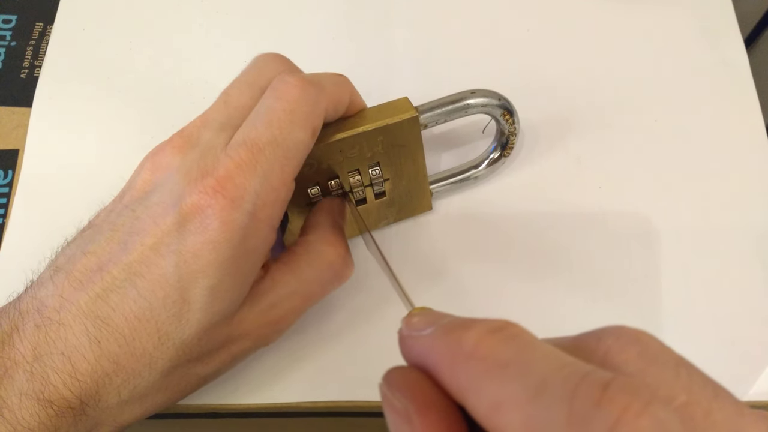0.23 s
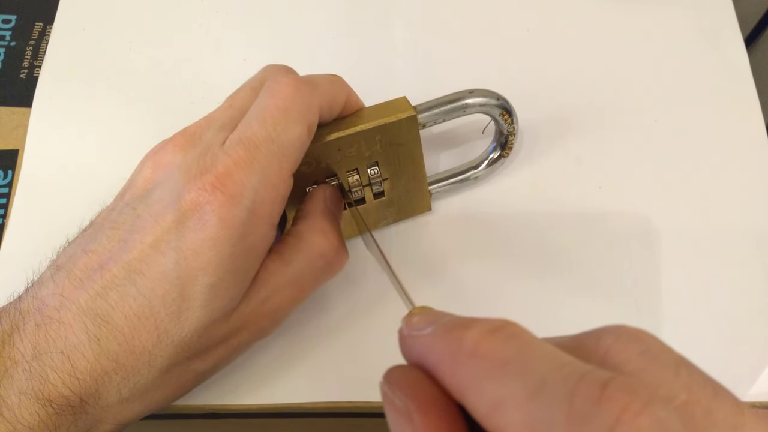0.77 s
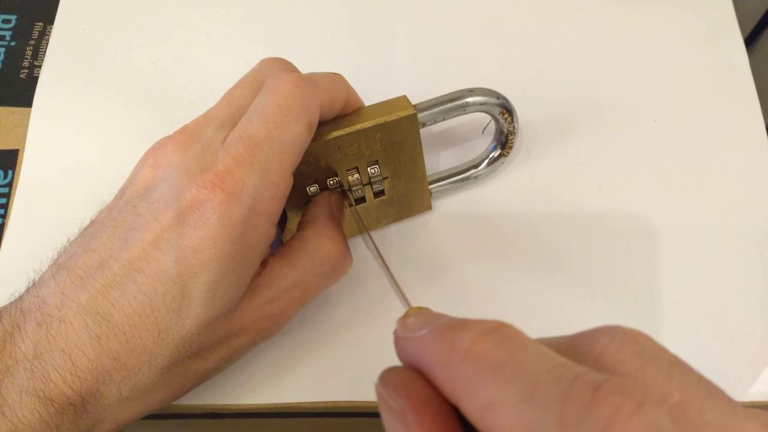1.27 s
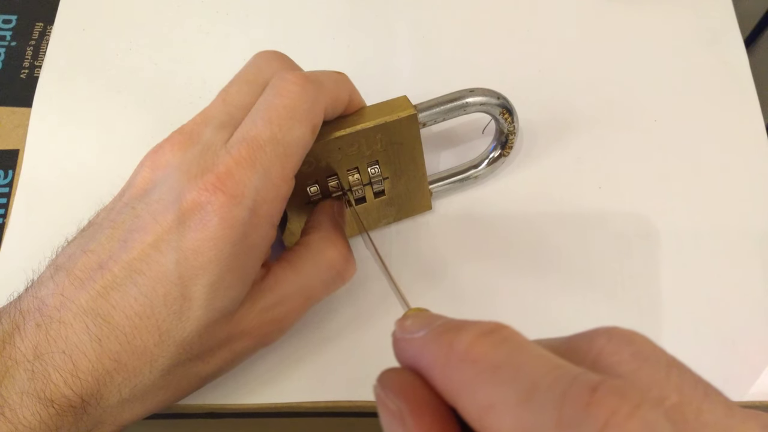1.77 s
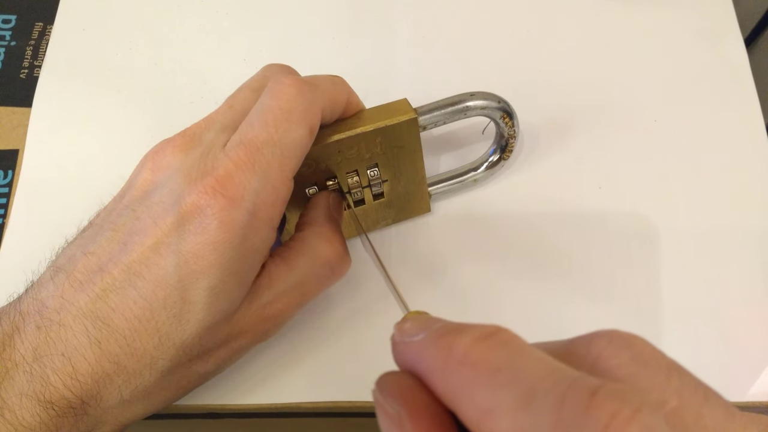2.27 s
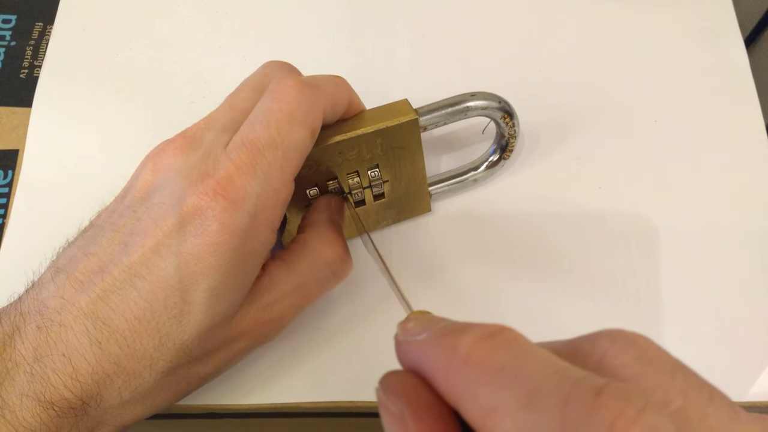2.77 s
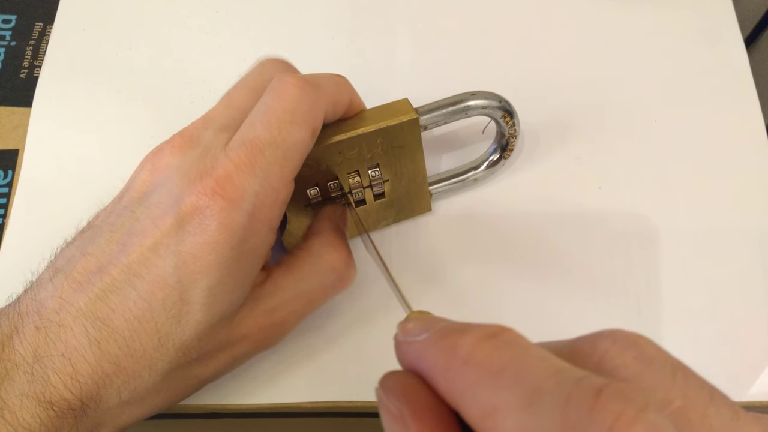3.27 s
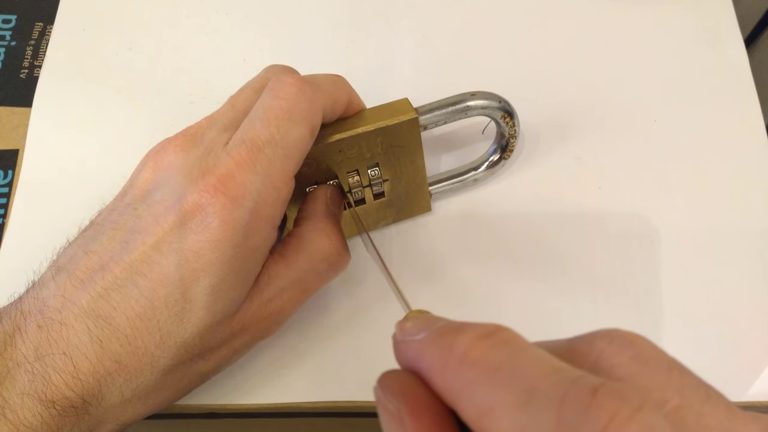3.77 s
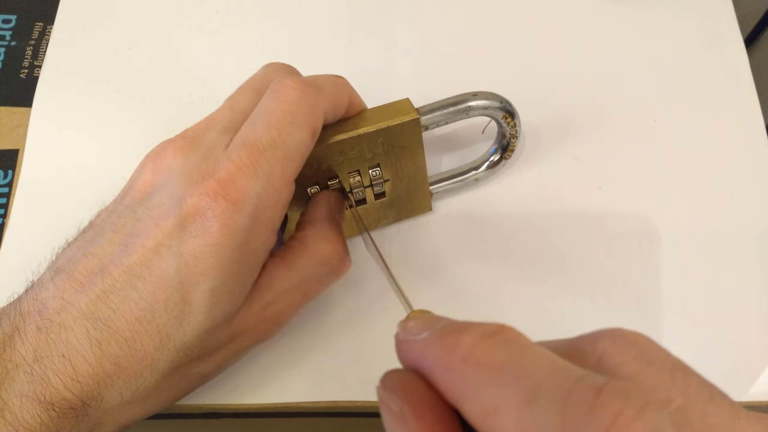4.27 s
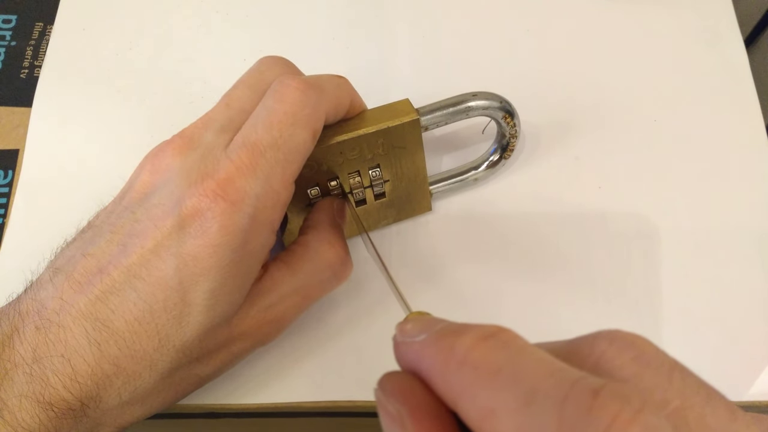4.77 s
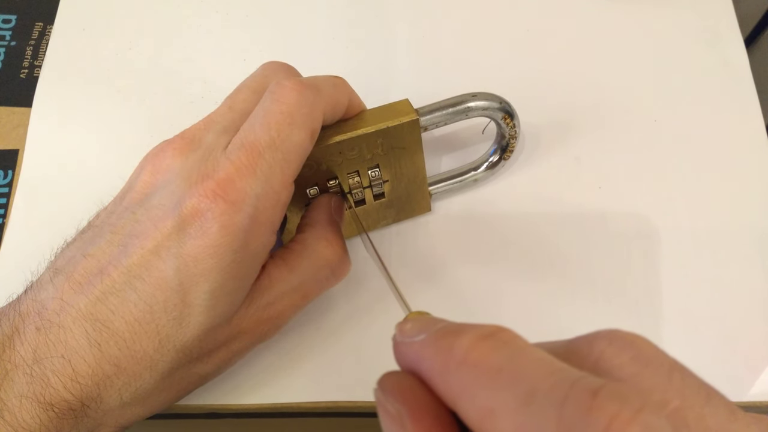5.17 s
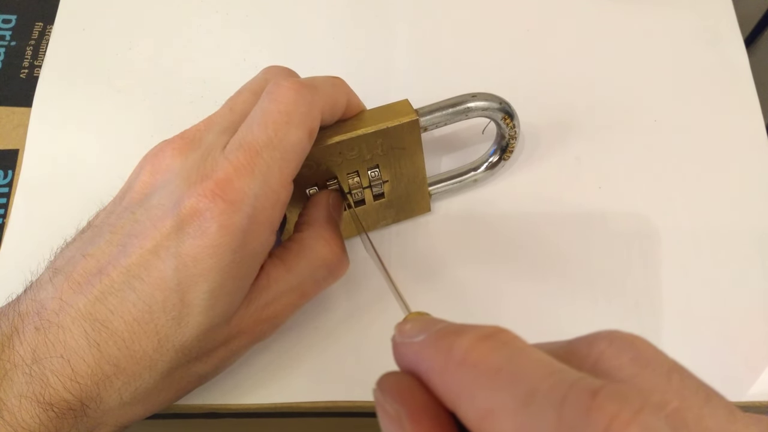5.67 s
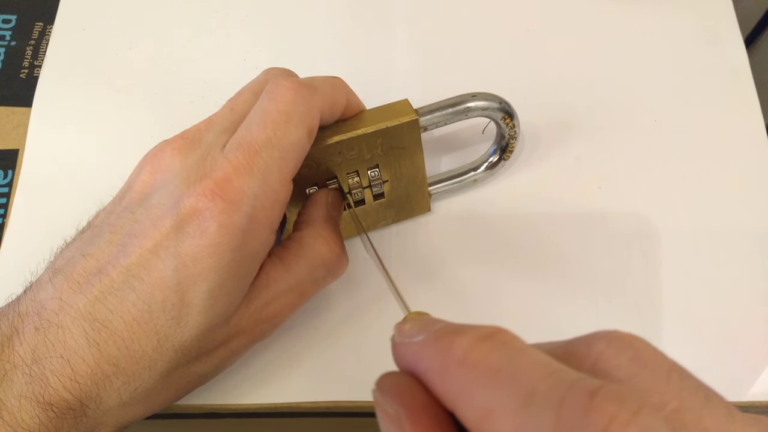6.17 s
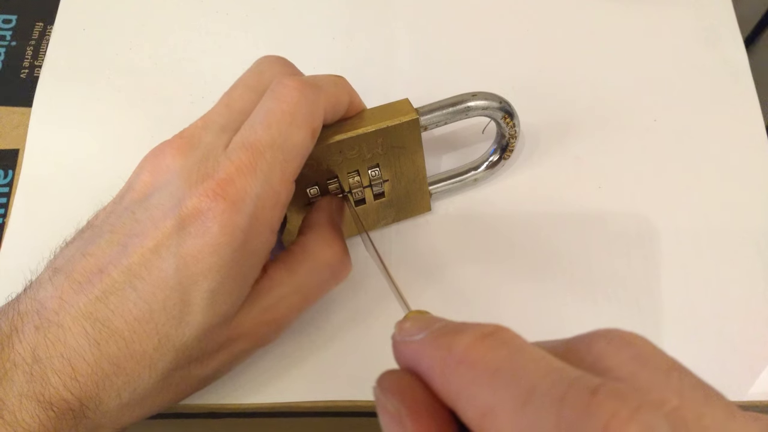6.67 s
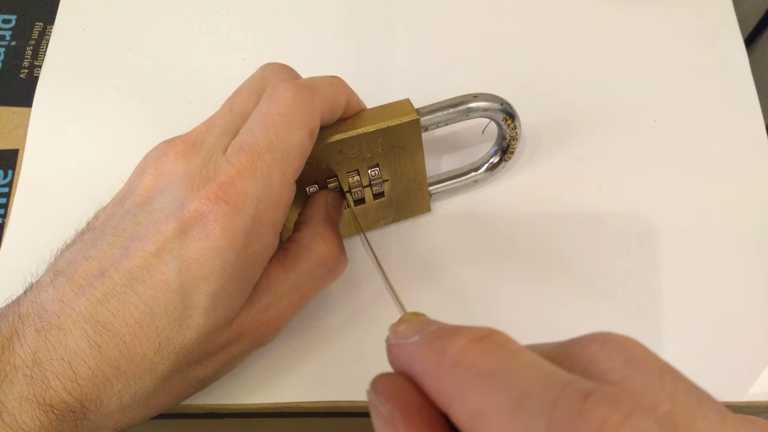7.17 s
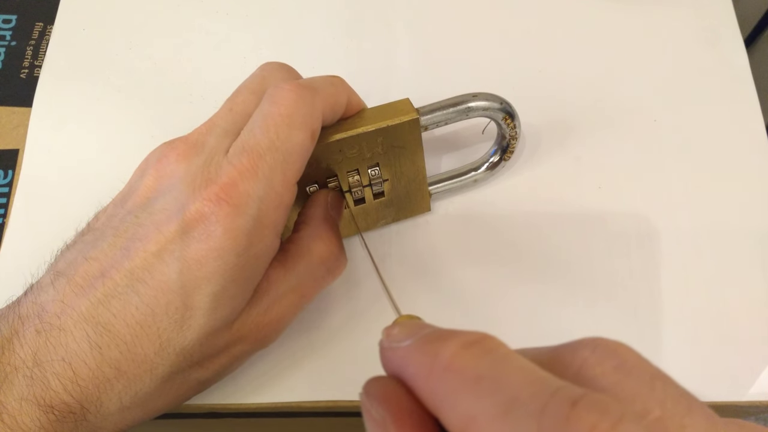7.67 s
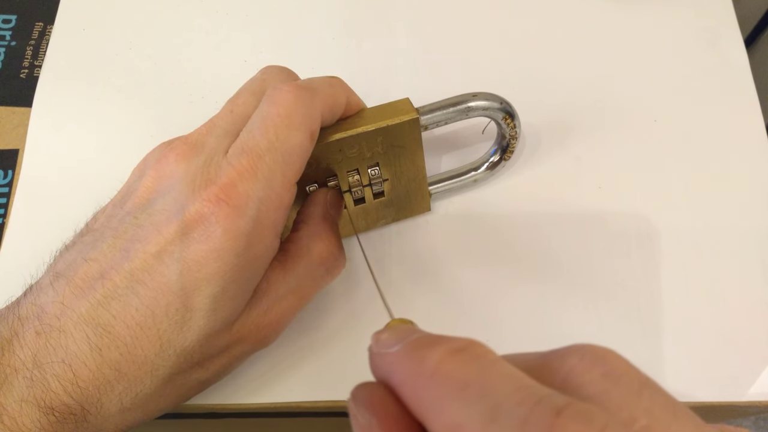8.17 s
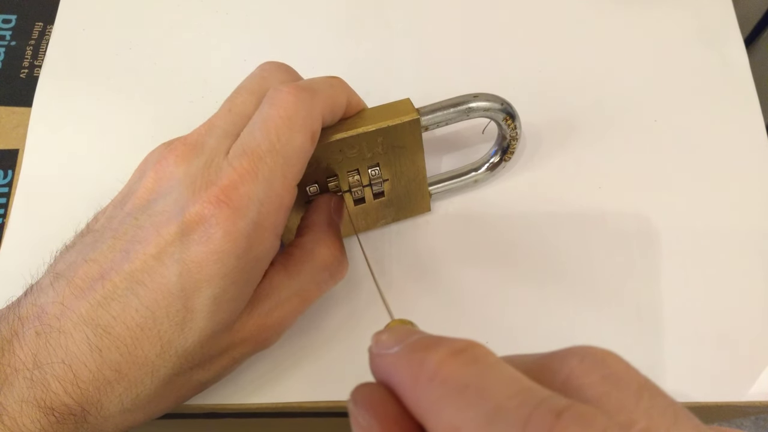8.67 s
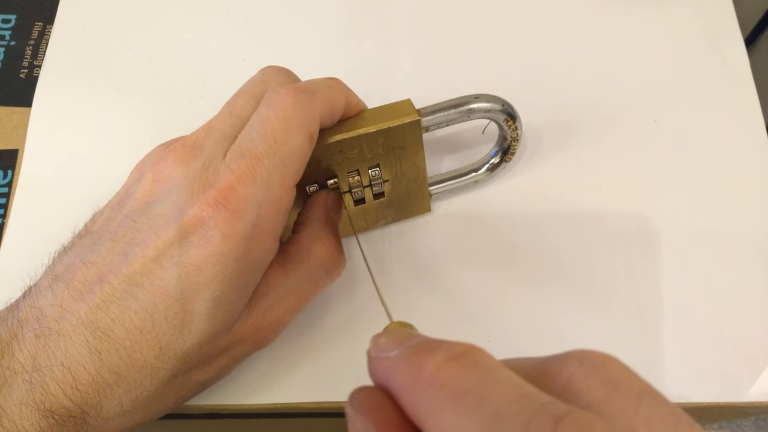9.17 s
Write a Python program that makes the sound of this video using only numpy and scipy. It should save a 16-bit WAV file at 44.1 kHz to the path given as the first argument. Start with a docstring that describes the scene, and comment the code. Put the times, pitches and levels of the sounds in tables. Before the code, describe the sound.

Close to the microphone, a small brass padlock's number wheel snaps with dry, very bright clicks, some followed by a dull tap on the table. Soft, grainy rubbing of thumb and blade comes between. The clicks are busiest in the first five seconds, then sparse. A steady low mains hum and faint hiss fill the quiet room, the hiss throbbing slightly with the hum.

```python
"""A bright snap of brass comes first, close by, over the hum of appliances in a quiet room.
A padlock's number wheel is thumbed from notch to notch beside a thin steel blade: filtered bursts make the
cracks, dying sines ring wheel, body and table, and grainy noise makes the soft rubbing between.
Steady tones, a wandering rumble and coloured noise fill the room.
The recorder's expander makes the hiss throb with the beating of the hum."""
import sys
import numpy as np
from scipy import signal
from scipy.fft import rfft, irfft, next_fast_len
from scipy.io import wavfile

SR = 44100
rng = np.random.default_rng(int(sys.argv[2]) if len(sys.argv) > 2 else 0)


def digitize_waveform(pressure):
    """Quantize a signal to 16-bit integers and store it at the path in sys.argv[1].

    Rows of a 2-D input are taken as channels; values are limited to [-1, 1].
    """
    field = np.atleast_2d(pressure).T
    bounded = np.clip(field, -1, 1)
    quanta = np.round(bounded * 32767).astype(np.int16)
    wavfile.write(sys.argv[1], SR, quanta)


N = 414981  # length [samples]

# All levels below are those ahead of the expander.
# Room air and microphone hiss: (frequency [Hz], density [dB per Hz])
AIR_SPECTRUM = [(20, -103), (45, -83), (130, -70), (180, -91.5), (330, -84), (500, -86), (1000, -90.5),
                (1150, -95), (1500, -93.5), (1750, -99.5), (2400, -97.5), (4000, -99), (6500, -99),
                (8000, -100.5), (9500, -97), (11000, -99.5), (12000, -100), (15600, -101), (15900, -135)]
# Noise gathering in resonances: (centre [Hz], width [Hz], level [dB rms])
BOOM_BANDS = [(68.9, 11.5, -51), (97, 81, -66), (205, 40, -66), (281.2, 16, -65.5), (1610, 11.4, -71),
              (1830, 270, -71.5), (4770, 45, -84)]
# Steady tones of mains and fans: (frequency [Hz], level [dB rms])
HUM_TONES = [(90.0, -49.5), (100.3, -54.5), (120.0, -40.5), (358.45, -68.5), (380.02, -69.5),
             (409.67, -57.5), (434.32, -68.5), (460.87, -70.5), (467.7, -73), (614.51, -75.5), (635.2, -79),
             (672.3, -75.5), (761.55, -76.5), (961.23, -77.5), (1024.18, -76.5), (1357.23, -77.5),
             (1433.94, -81.5), (1476.28, -78.5), (1491.62, -77.5), (1580.76, -77.5), (1591.87, -76.5),
             (1638.62, -74.5), (1785.9, -83), (1880.85, -83.5), (2805.4, -85)]
# A small motor's overtones: (multiple of MOTOR_HZ, level [dB rms])
MOTOR_OVERTONES = [(11, -79.5), (12, -76.5), (14, -74.5), (16, -75.5), (17, -77.5), (19, -81.5),
                   (24, -82.5), (27, -78.5), (29, -82.5), (31, -78.5), (32, -75.5), (34, -80.5),
                   (35, -83.5), (36, -83), (37, -77.5), (48, -82), (49, -80.5), (50, -80.5), (52, -80.5),
                   (60, -86), (62, -87), (81, -82.5), (82, -82.5), (83, -82.5), (85, -84)]
MOTOR_HZ = 57.793
# Level curve of the low rumble: (time [s], level [dB])
RUMBLE_LEVEL = [(0, -62), (1.5, -58.5), (3.7, -61), (4.48, -61), (4.7, -66), (5.7, -67), (8.2, -59),
                (8.4, -53), (9.41, -59.5)]
RUMBLE_WANDER_DB, RUMBLE_STEP_S = 2, .08  # random spread around the curve; time between its turns

# Blade and thumb rub against the wheel, levels before the swell and fade:
# (time [s], length [s], hiss [dB], lock body [dB], table [dB])
RUB_STROKES = [(0.218, 0.026, -59, -77, -64), (0.601, 0.05, -56, -71, -64), (1.004, 0.061, -55, -64, -60),
               (1.815, 0.077, -70, -62, -54.5), (1.995, 0.052, -59, -68, -57), (2.189, 0.11, -62, -75, -61),
               (3.219, 0.019, -58, -63, -54.5), (3.325, 0.027, -61, -70, -56), (3.648, 0.1, -59, -65, -59),
               (3.952, 0.019, -60, -50.5, -54), (4.183, 0.035, -55.5, -64, -57.5),
               (4.381, 0.039, -49, -52.5, -55.5), (8.317, 0.022, -56, -66, -45.5),
               (8.337, 0.035, -64, -59, -50), (8.419, 0.026, -62, -61, -50), (8.574, 0.047, -61, -76, -58),
               (8.85, .04, -62, -66, -69)]
# Colour of the rubbing hiss: (frequency [Hz], relative level [dB])
RUB_HISS = [(6500, -20), (8000, -5), (9000, 5), (10500, 3), (12000, -7), (16000, -19)]

# Snaps of the wheel; slip, chatter and room tail are relative to the crack's peak, before their envelopes:
# (time [s], crack peak [dB], crack centre [Hz], contact decay [ms], slip before it [dB], chatter [dB],
#  room tail [dB], lift of the top band [dB], lock body [dB], centre of body ring [Hz],
#  focus of body ring [dB per octave squared], table knock [dB], centre of knock [Hz])
WHEEL_SNAPS = [(0.0004, -12.5, 11700, 0.21, -40, -24, -35.5, 10, -37, 4300, 10, -52, 744),
               (1.233, -16, 10800, 0.22, -11, -20, -34, 15, -40.5, 4270, 3, -52, 740),
               (1.8074, -16.5, 12500, 0.52, -30, -22, -37, 7, -36.5, 2300, 4.3, -29.5, 780),
               (1.863, -38, 8810, 0.8, -30, -18, -34, 0, -47, 4600, 5, -50, 740),
               (2.0277, -17.5, 11100, 0.21, -30, -24, -33.5, 12, -44, 3010, 8, -50, 740),
               (2.065, -37, 9920, 0.67, -12, -22, -35, 0, -36.5, 4700, 8, -33.5, 880),
               (3.0485, -11, 11300, 0.09, -30, -15, -37, 16, -40, 6600, 6, -55, 740),
               (3.365, -33.5, 11500, 0.32, -30, -15, -31, 0, -38, 2800, 7.5, -33, 740),
               (3.8277, -10.5, 12100, 0.15, -17, -12, -37.5, 0, -34.5, 2930, 10, -52, 740),
               (3.9493, -22.5, 9200, 0.3, -7, -24, -28.5, 3, -30.5, 4040, 2, -42, 950),
               (4.4228, -10, 11900, 0.16, -18, -16, -39, 6, -33, 3300, 3, -42, 850),
               (4.6379, -26.5, 9800, 0.61, -30, -28, -40, 0, -35, 2400, 2, -34, 900),
               (6.501, -60, 9600, 0.4, -30, -20, -33, 0, -58, 3000, 12, -35, 1000),
               (6.5547, -22.5, 12000, 0.33, -19, -18, -39, -6, -34.5, 3150, 41, -28, 696),
               (7.4676, -40, 9470, 0.33, -30, -10, -24, 0, -43, 4400, 12, -58, 740),
               (8.355, -34, 9600, 0.43, -30, -18, -33, 0, -49, 3900, 12, -52, 740),
               (8.362, -50, 9080, 0.47, -30, -14, -33, 0, -44, 4700, 12, -50, 740),
               (8.3722, -59, 10170, 0.43, -30, -6, -33, 0, -61, 2940, 12, -29.5, 740),
               (8.4019, -24.5, 9400, 1, -3, -14, -35, 2, -25, 4740, 85, -18, 750),
               (8.9156, -13, 12500, 0.24, -11, -23, -35, 4, -39, 3400, 3.6, -56, 740)]
# Shared colour of the cracks: (frequency [Hz], relative level [dB])
SNAP_SPECTRUM = [(2000, -40), (4500, -23), (6300, -10), (7400, 2.5), (8200, 1.5), (10700, 3.5),
                 (13000, 1.5), (15600, -5), (17000, -30)]
# Ringing modes of wheel, brass body and table: (frequency [Hz], relative level [dB], 60 dB decay [s])
WHEEL_MODES = [(8600, -17, .04), (8600, -12, .04), (10400, -19, 0.036), (11100, 8, .045), (10600, -16, .1),
               (12200, 8, 0.026), (13300, -1, 0.025), (13750, -16, .03), (14100, -5, .025),
               (15250, -4, .015)]
BODY_MODES = [(1876, 4, 0.011), (2770, -4.5, 0.035), (3260, 11.5, 0.0077), (3850, 8.5, 0.0059),
              (4340, 5.5, 0.011), (4900, 9.5, 0.011), (5250, 6.5, 0.011), (6260, 6.5, 0.019)]
TABLE_MODES = [(227, -13, 0.028), (442, 0, 0.035), (600, 1, 0.03), (718, 7, 0.07), (850, 3, 0.025),
               (980, 4, 0.022), (1200, 1, 0.022), (1650, -5, .018)]

NARROW_DB = 27  # fall either side of a snap's centre [dB per octave squared]
TOP_HZ, TOP_OCTAVES = 15500, 0.12  # narrow bright band above the main snap
ROOM_DULL_DB = 9  # treble lost by the room tail from 10 to 20 kHz [dB]
SLIP_MS, LANDING_S = 0.7, 0.0047  # rise of the slip before a snap; delay of the spring's second landing
EARLY = 100  # room for the slip ahead of a snap [samples]

PIVOT_DB, MAX_LIFT_DB = -36, 2.5  # expander: level passed unchanged, greatest lift
EDGE_HZ = 16600  # upper band limit


def gain_of(db):
    """Turns decibels into amplitude."""
    return 10 ** (np.asarray(db) / 20)


def coloured(x, points, size):
    """Filters by a spectrum of (frequency [Hz], level [dB]) points, joined on a log frequency scale."""
    f, db = np.transpose(points)
    hz = np.fft.rfftfreq(size, 1 / SR)
    response = gain_of(np.interp(np.log(hz + 1), np.log(f), db))
    return irfft(rfft(x, size) * response, size)


def band(x, low_hz, high_hz):
    """Band-passed copy of rms 1."""
    y = signal.sosfilt(signal.butter(2, [low_hz, high_hz], "bandpass", fs=SR, output="sos"), x)
    return y / y.std()


def ring(modes, t, phases, hz, narrow_db):
    """Struck solid: dying sines, favoured near hz, scaled to peak 1."""
    f, db, t60 = np.transpose(modes)[:, :, None]
    db = db - narrow_db * np.log2(f / hz) ** 2
    decay = gain_of(db - 60 * t / t60)
    x = (decay * np.sin(2 * np.pi * (f * t + phases[:len(f), None]))).sum(0)
    return x / abs(x).max()


def air():
    """Broad noise plus a few boomy bands where the room and the machines resonate."""
    size = next_fast_len(N)
    out = coloured(rng.standard_normal(size), AIR_SPECTRUM, size=size) * np.sqrt(SR / 2)
    f = np.fft.rfftfreq(size, 1 / SR)
    for hz, width, db in BOOM_BANDS:
        resonance = 1 / (1 + (2 * (f - hz) / width) ** 2)
        boom = irfft(rfft(rng.standard_normal(size)) * resonance, size)
        out += gain_of(db) * boom / boom.std()
    return out[:N]


def hum():
    """Steady machine tones whose phases drift at random, the higher ones more."""
    motor = [(round(k) * MOTOR_HZ, db) for k, db in MOTOR_OVERTONES]
    tones = np.array(list(HUM_TONES) + motor)
    t, knots = np.arange(N) / SR, np.arange(0, N / SR + 1, .25)
    steps = rng.standard_normal((len(tones), len(knots)))
    drift = np.cumsum(steps, 1) * 0.00018 * tones[:, :1]
    start = rng.random(len(tones)) * 2 * np.pi
    out = np.zeros(N)
    for (hz, db), phase, wander in zip(tones, start, drift):
        angle = 2 * np.pi * hz * t + phase + np.interp(t, knots, wander)
        out += np.sqrt(2) * gain_of(db) * np.sin(angle)
    return out


def rumble():
    """Low band of noise that wanders around its level curve."""
    s, db = np.transpose(RUMBLE_LEVEL)
    t = np.arange(N) / SR
    wander = np.interp(t / RUMBLE_STEP_S, np.arange(400), rng.standard_normal(400))
    level = gain_of(np.interp(t, s, db) + RUMBLE_WANDER_DB * wander)
    return level * band(rng.standard_normal(N), 179, 246)


def rub(length, hiss_db, body_db, table_db):
    """Uneven grains of friction swell quickly and fade, heard in three bands."""
    noise = rng.standard_normal((4, 8192))
    u = np.arange(8192) / SR / length  # progress of the stroke, 0 to 1
    grains = gain_of(2.2 * band(noise[3], 60, 520))
    swell = np.clip(np.minimum(u / 0.35, (1 - u) / 0.38), 0, 1)
    stroke = grains / np.sqrt(np.mean(grains ** 2)) * swell
    hiss = coloured(noise[0], RUB_HISS, size=8192)
    hiss = gain_of(hiss_db) * hiss / hiss.std()
    body = gain_of(body_db) * band(noise[1], 3400, 6100)
    table = gain_of(table_db) * band(noise[2], 360, 1370)
    return stroke * (hiss + body + table)


def click(db, hz, contact_ms, slip_db, chatter_db, room_db, top_db, body_db, body_hz, focus_db,
          knock_db, knock_hz):
    """A slip, then a metal crack and its bounce off the table, wheel ring, scattered tail, body and knock."""
    t = np.arange(8192) / SR
    phases, noise = rng.random(16), rng.standard_normal((4, len(t)))

    # each contact favours its own band
    grid = np.geomspace(2000, 20000, 80)
    f, snap_db = np.transpose(SNAP_SPECTRUM)
    lean = np.interp(np.log(grid), np.log(f), snap_db) - NARROW_DB * np.log2(grid / hz) ** 2
    lean = lean + top_db * np.exp(-(np.log2(grid / TOP_HZ) / TOP_OCTAVES) ** 2)
    lean = np.transpose([grid, lean])

    # an impulse with a short noisy contact, then the fainter bounce 1.5 ms later
    hit = .25 * noise[0] * np.exp(-t * 1000 / max(contact_ms, .05))
    hit[0] = 1
    hit = np.roll(hit, EARLY + 50) + .16 * np.roll(hit, EARLY + 116)
    crack = coloured(hit, lean, size=len(t)) * (t < .02) * np.minimum(t / .003, 1)
    crack = crack / abs(crack).max()

    # time before and after the snap
    since = t - EARLY / SR - .001
    ahead, t = np.minimum(since, 0), np.maximum(since, 0)

    scatter = coloured(noise[1], lean, size=len(t))
    even_scatter = scatter / scatter.std()
    slip = even_scatter * .5 * gain_of(slip_db - 60 * t / 0.0028) * np.exp(ahead * 1000 / SLIP_MS)

    # loose parts chatter, the spring lands a second time, then the nearby walls answer
    landing = np.exp(-((t - LANDING_S) / 0.0007) ** 2)
    chatter = even_scatter * gain_of(chatter_db) * (0.6 * gain_of(-60 * t / 0.012) + 0.25 * landing)
    dull = coloured(scatter, [(10000, 0), (20000, -ROOM_DULL_DB)], size=len(t))
    walls = dull / dull.std() * gain_of(room_db - 60 * (t - .02) / 0.15)  # room level is met at 20 ms
    tail = (chatter + walls) * (1 - np.exp(-t / 0.00012))

    wheel = 0.6 * gain_of(chatter_db) * ring(WHEEL_MODES, t, phases, hz, NARROW_DB)
    wheel = wheel * (1 - np.exp(-t / 0.00034))

    body = ring(BODY_MODES, t, phases[::-1], body_hz, focus_db) * (1 - np.exp(-t / 0.00053))
    body = body + 0.1 * np.roll(body, round(LANDING_S * SR))
    body_noise = band(noise[2], 0.55 * body_hz, 1.1 * body_hz)
    body = body + 0.1 * body_noise * gain_of(-60 * t / 0.055) * (t > 0)

    knock_noise = band(noise[3], 0.81 * knock_hz, 1.14 * knock_hz) * gain_of(-60 * t / 0.14)
    knock = ring(TABLE_MODES, t, 0.03 * phases, knock_hz, 5.0) + 0.06 * knock_noise
    knock = knock * (1 - np.exp(-(t / 0.0008) ** 2))

    metal = gain_of(db) * (crack + slip + wheel + tail)
    return metal + gain_of(body_db) * body + gain_of(knock_db) * knock


def lock():
    """The padlock: every snap and rubbing stroke laid into one mix at its moment."""
    out = np.zeros(N + 8192 + EARLY)
    for play, table, late in ((click, WHEEL_SNAPS, 0), (rub, RUB_STROKES, EARLY)):
        for s, *settings in table:
            out[round(s * SR) + late:][:8192] += play(*settings)
    return out[EARLY:N + EARLY]


def scene():
    """The lock in the humming room, as one channel."""
    return (lock() + hum() + rumble() + air())[None]


def record(dry):
    """An expander turns quiet moments further down; then a low-pass limits the band."""
    window = np.hanning(round(.02 * SR))
    bass = signal.oaconvolve(dry[0], signal.firwin(801, 400, fs=SR), "same")
    bass_power = signal.oaconvolve(bass ** 2, window / window.sum(), "same")
    # the treble is sensed at once and let go in a few ms
    hold = np.exp(-1 / (.004 * SR))
    treble_power = signal.lfilter([3 * (1 - hold)], [1, -hold], (dry[0] - bass) ** 2)
    power_db = 10 * np.log10(abs(bass_power + treble_power) + 1e-12)
    slope = .68  # gain change per dB of level [dB]
    gain_db = np.clip(slope * (power_db - PIVOT_DB), -15.0, MAX_LIFT_DB)
    low_pass = signal.firwin(511, EDGE_HZ, window=("kaiser", 9), fs=SR)
    return signal.oaconvolve(dry * gain_of(gain_db), low_pass[None], "same")


dry = scene()
out = record(dry)
digitize_waveform(out)
```